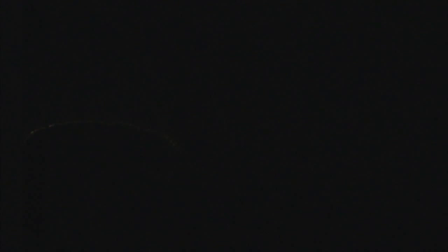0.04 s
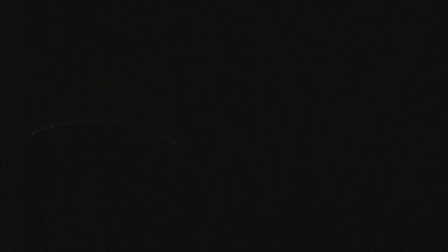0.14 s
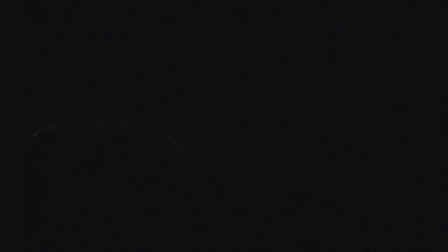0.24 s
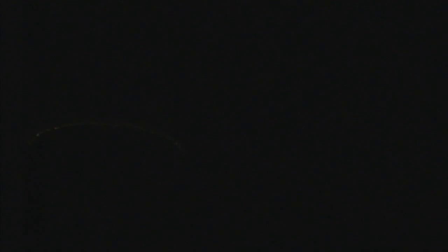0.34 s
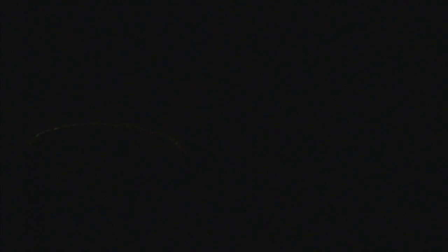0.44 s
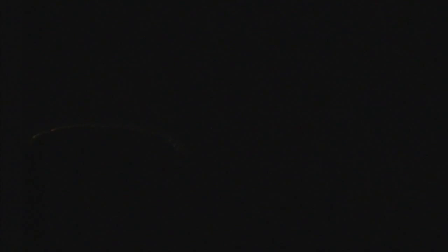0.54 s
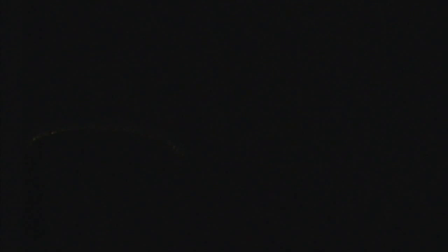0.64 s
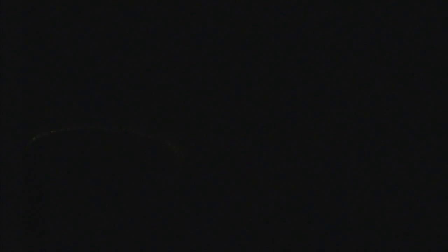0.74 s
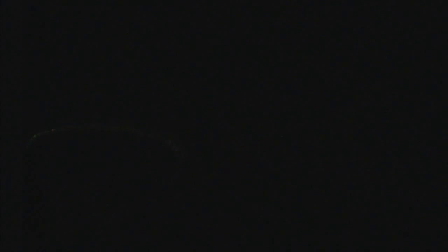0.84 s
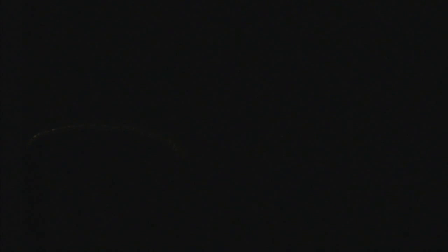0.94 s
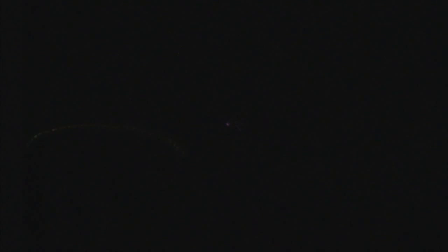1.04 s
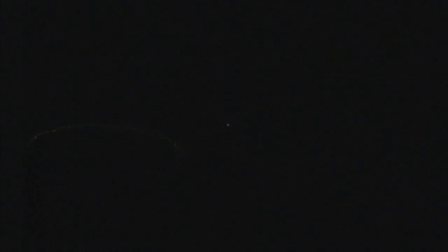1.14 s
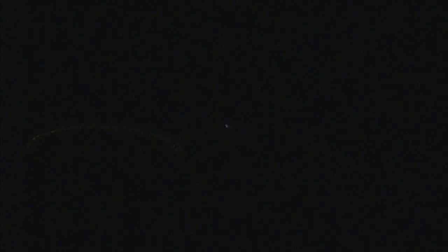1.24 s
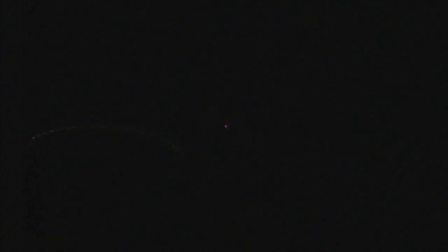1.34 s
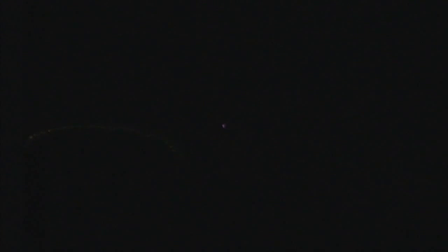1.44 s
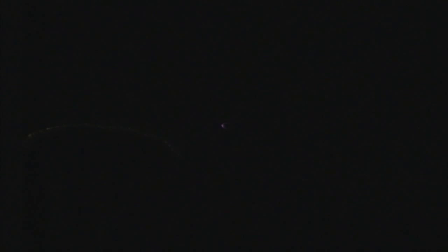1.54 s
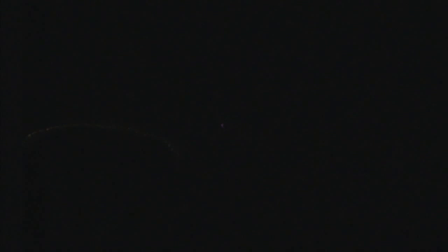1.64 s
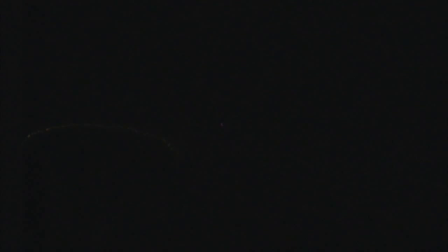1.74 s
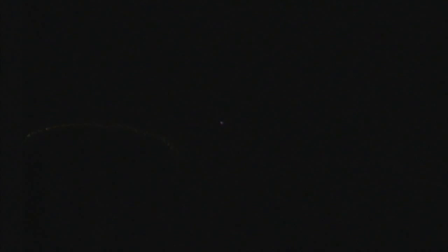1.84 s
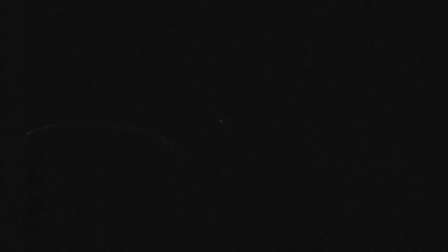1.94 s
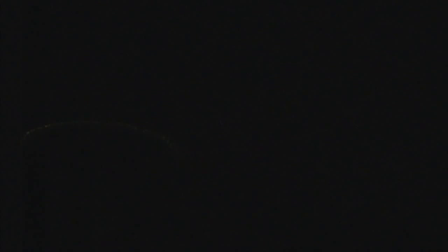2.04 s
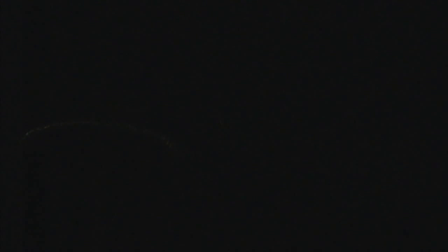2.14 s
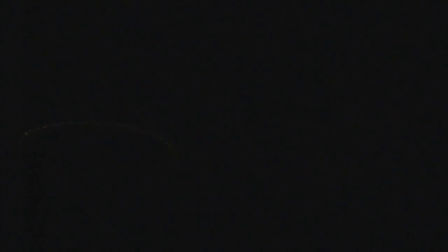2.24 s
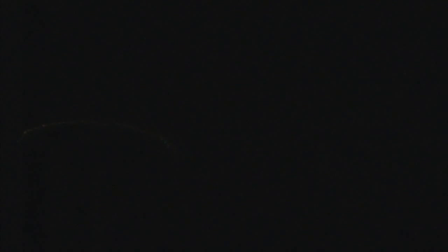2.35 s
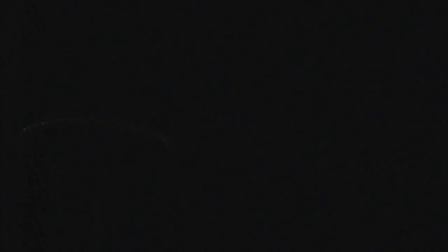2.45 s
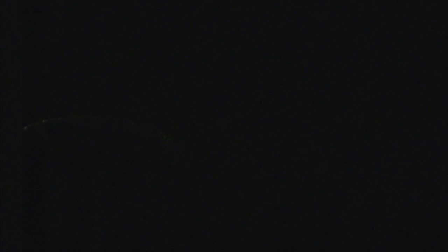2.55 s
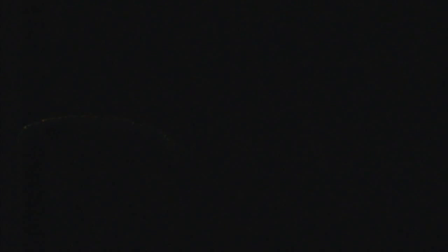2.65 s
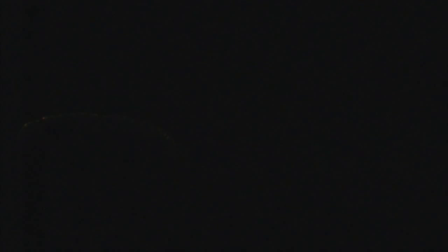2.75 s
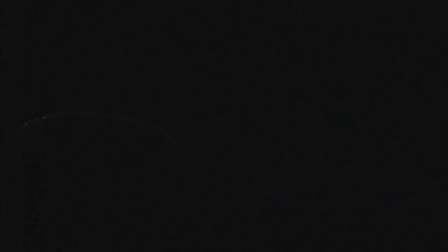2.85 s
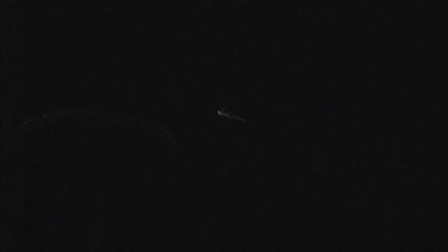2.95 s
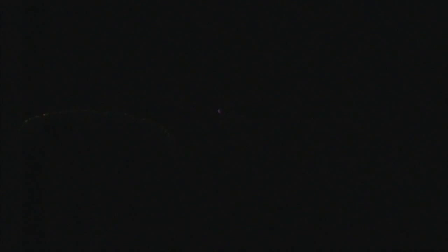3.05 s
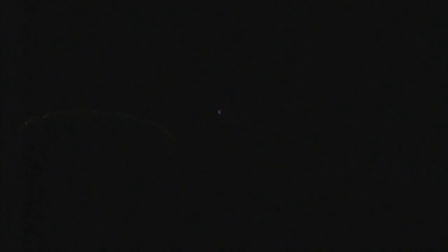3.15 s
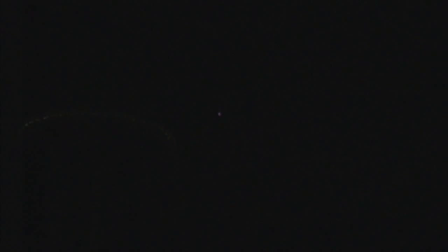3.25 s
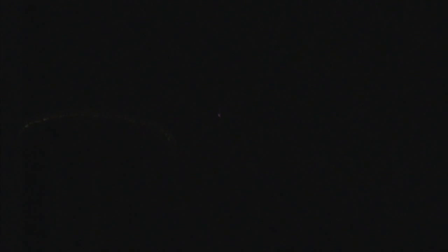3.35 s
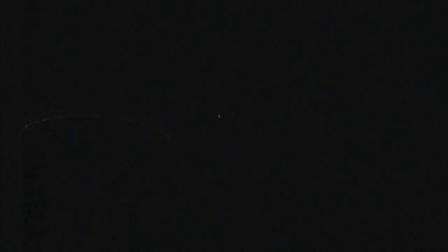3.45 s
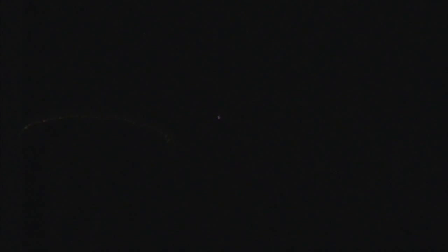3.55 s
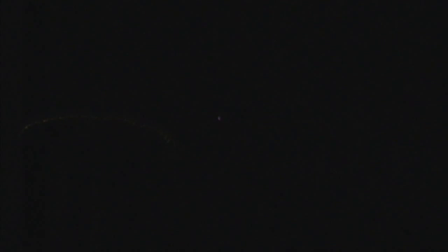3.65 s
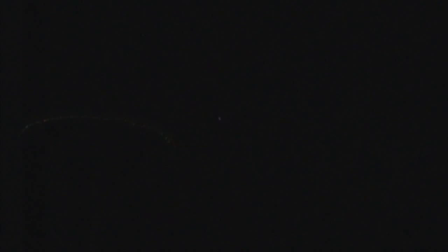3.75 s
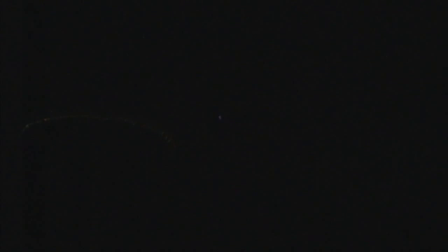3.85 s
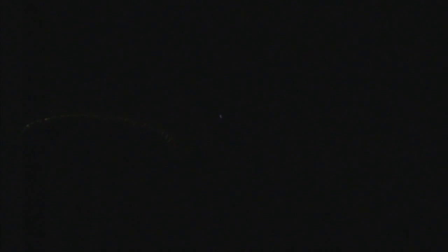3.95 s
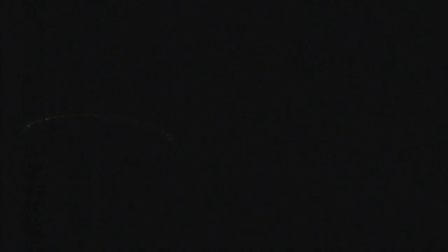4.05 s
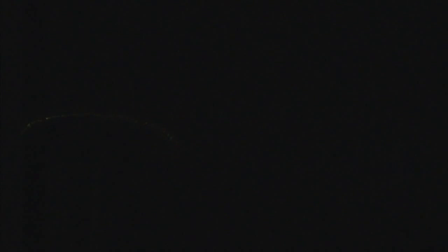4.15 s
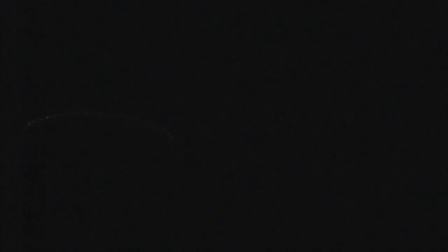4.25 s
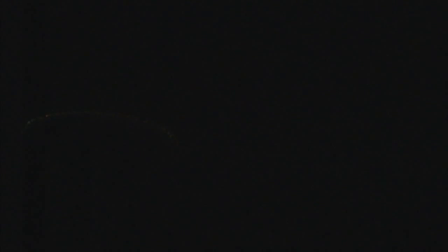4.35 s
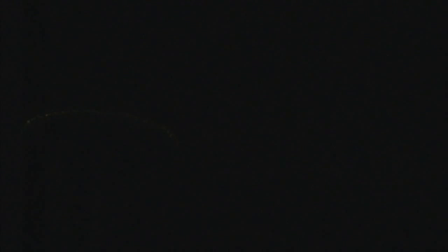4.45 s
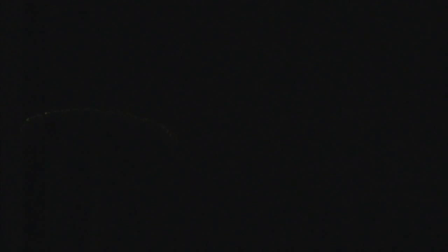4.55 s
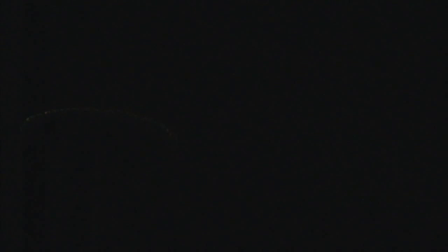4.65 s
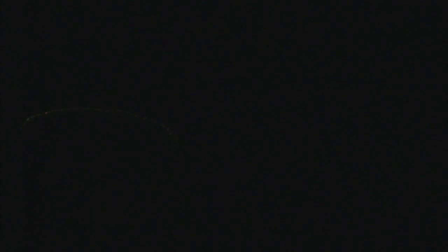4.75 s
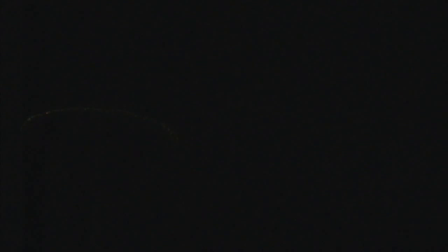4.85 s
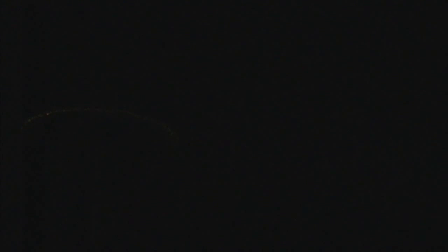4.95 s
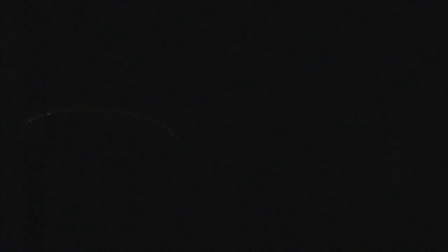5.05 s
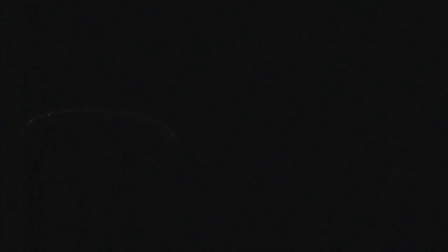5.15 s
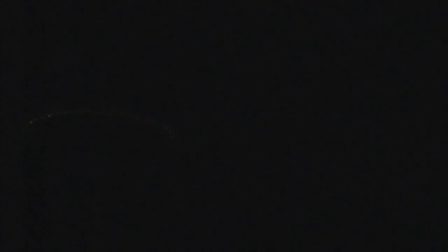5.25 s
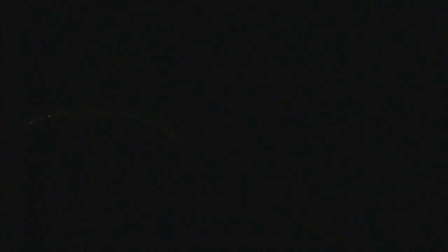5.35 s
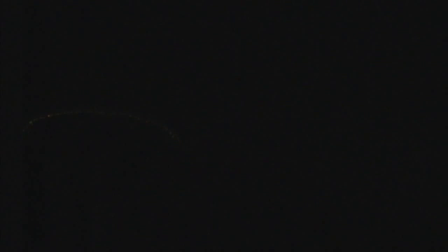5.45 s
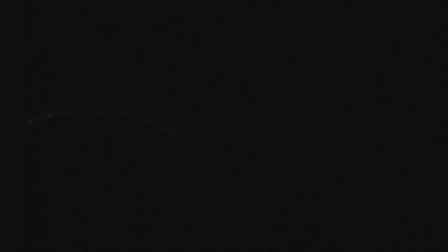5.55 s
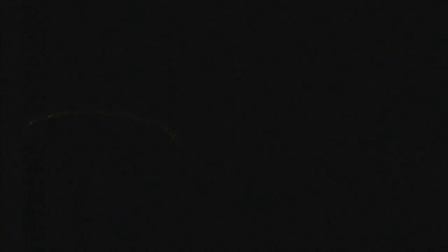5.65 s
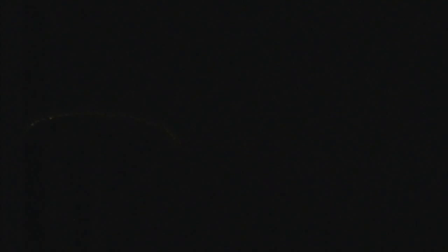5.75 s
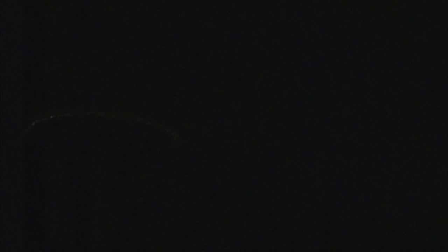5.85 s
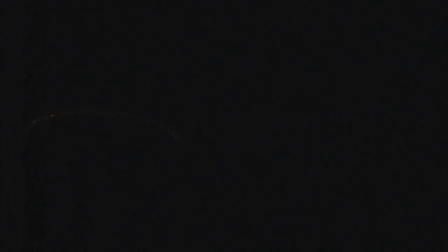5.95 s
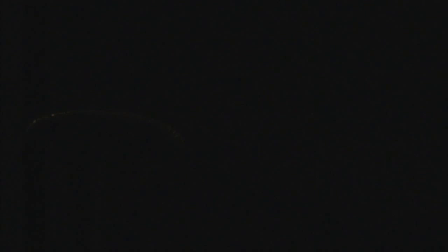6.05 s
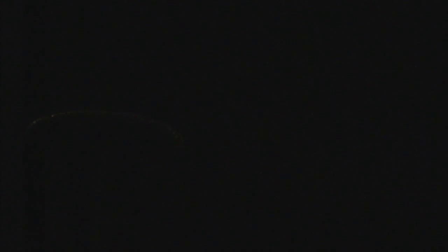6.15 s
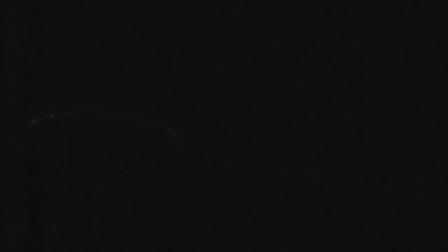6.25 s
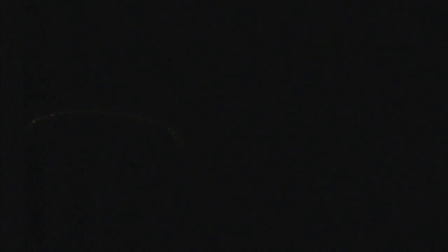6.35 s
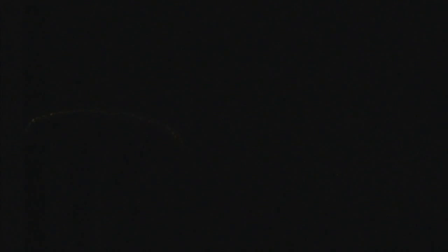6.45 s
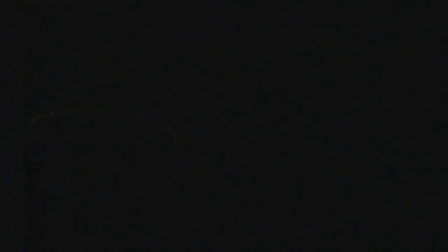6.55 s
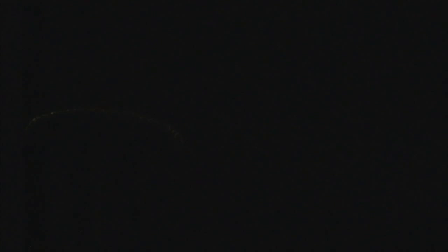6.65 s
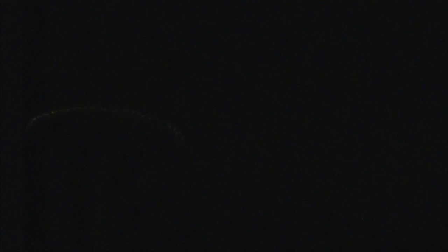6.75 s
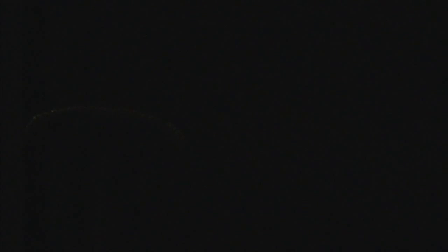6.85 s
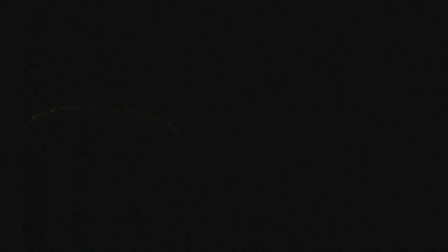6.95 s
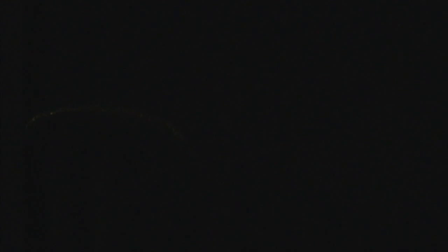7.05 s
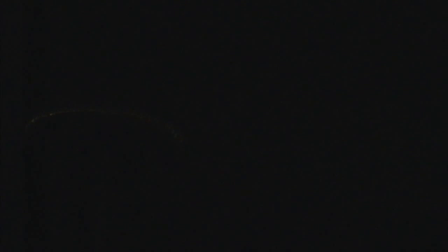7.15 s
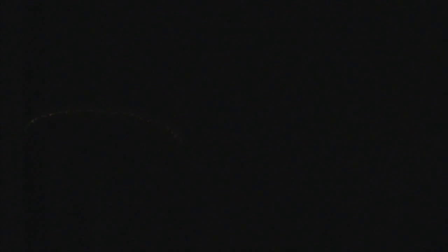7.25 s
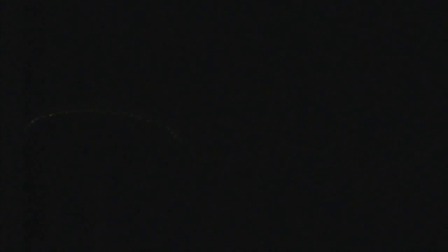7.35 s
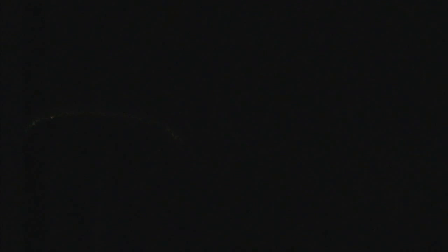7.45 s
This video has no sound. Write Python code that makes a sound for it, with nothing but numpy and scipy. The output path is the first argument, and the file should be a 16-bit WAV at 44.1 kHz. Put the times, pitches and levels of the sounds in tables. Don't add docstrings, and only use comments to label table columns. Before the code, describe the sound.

The tail of a harsh electric buzz stops almost immediately, leaving a rushing, whining fan outdoors at night. A sharp switch snap triggers a fierce, bright spark buzz for a second; a soft rustle follows, then another snap and burst. Afterwards come only fan, low air bumps and three loud lone snaps. The microphone's automatic level ducks the fan in each burst and slowly lifts it back.

```python
import sys
import numpy as np
from scipy import signal
from scipy.fft import rfft, irfft, next_fast_len
from scipy.io import wavfile
from scipy.ndimage import uniform_filter1d

SR = 44100
rng = np.random.default_rng(int(sys.argv[2]) if len(sys.argv) > 2 else 0)


def digitize_waveform(pressure):
    field = np.atleast_2d(pressure).T
    bounded = np.clip(field, -1, 1)
    quanta = np.round(bounded * 32767).astype(np.int16)
    wavfile.write(sys.argv[1], SR, quanta)


def attenuation_scalar(level_db):
    decades = np.asarray(level_db, float) / 20
    return 10 ** decades


N = 331014
T = np.arange(N) / SR

# on [t/s], off [t/s], arc path [0 or 1]
COIL_RUNS = [
    (-.2, .046, 1),
    (1.038, 2.071, 0),
    (3.013, 4.038, 1),
]
# time [t/s], strength [level/dB]
ARC_STRENGTH = [
    [(0, -6.5), (.034, -2.5), (.047, -8)],
    [(1.04, -2), (1.07, -3.5), (1.2, -4.5), (1.4, -5), (1.6, -4), (1.8, -6), (2.07, -4.5)],
    [(3.015, -2), (3.04, -2.5), (3.2, -6.5), (3.4, -5), (3.55, -4), (3.7, -6), (3.9, -5), (4.05, -5.5)],
]
# time [t/s], peak as heard [level/dB]
FIRST_SPARKS = [
    (1.0186, 0),
    (1.0252, -5),
    (1.0312, -6),
    (2.9910, 2),
    (3.0003, -4),
    (3.0061, -8),
]
# pitch [f/Hz], width [f/Hz], on arc path 0 [level/dB], on arc path 1 [level/dB]
HOUSING_RINGS = [(1510, 500, -19.5, -18), (1822, 72, -10.5, -8), (2030, 140, -27, -19),
                 (2553, 96, -6.5, -5.5), (2760, 480, -11, -9), (3283, 81, -12, -11.5),
                 (3830, 164, -13.5, -11), (4260, 150, -14.5, -12.5), (4690, 350, -20, -14),
                 (5090, 67, -14, -15), (5650, 130, -17.5, -11.5), (6526, 600, -10, -7),
                 (7096, 128, -2.5, 0), (7407, 166, -3, -0.5), (7840, 95, -5.5, -3), (8320, 260, -4, -2.5),
                 (8830, 420, -7, -6), (9390, 180, -9, -9), (13695, 90, 1, -12), (10180, 260, -12.5, -10),
                 (10810, 160, -10, -7), (11200, 250, -12.5, -12.5), (12070, 260, -20, -9),
                 (12400, 200, -15, -9), (12170, 510, -14, -13), (13460, 430, -8, -7), (14100, 160, -4, 1.5),
                 (15200, 260, -7, -4), (15200, 250, -7.5, -4), (15440, 640, -7.5, -6.5)]
# pitch [f/Hz], gain [level/dB]
TREE_COLOUR = [(3000, -28), (6000, -12), (8000, -7), (9500, -10), (11500, -13), (12800, -6), (13700, 0),
               (14600, -5), (16000, -9)]
# time [t/s], peak [level/dB], treble [level/dB], treble top [f/Hz], case ring [level/dB]
SWITCH_SNAPS = [
    (0.0674, -30, 1, 12000, -7),
    (1.0095, -7.5, 0, 16000, 4),
    (2.079, -27, -8, 12000, 2),
    (2.9806, -8, -2, 16400, -5),
    (4.0439, -24.5, -4, 12000, -5),
    (4.8703, -6.5, -1, 18000, -1.5),
    (5.722, -7, -0.5, 12500, -6),
    (6.0697, -29.5, -24, 12000, 11.5),
    (6.6714, -9, -0.5, 17000, 1.5),
]
# pitch [f/Hz], strength [level/dB], time to fall 60 dB [t/s]
CASE_RINGS = [(520, -18, .03), (1180, -7, .025), (1600, -10, .025), (2000, -8, .02), (2290, 0, .03),
              (2650, -7, .02), (3120, -4, .018), (4060, 0, .022), (5270, -7, .018), (6020, -10, .015),
              (6450, -10, .018)]
# time [t/s], peak [level/dB], pitch [f/Hz]
AIR_KNOCKS = [(.118, -50, 220), (.4224, -43, 226), (0.7239, -36.5, 223.9), (.9095, -23, 266),
              (1.1574, -48, 218), (1.1755, -45, 260), (1.1994, -46, 204), (1.2127, -48, 247),
              (1.31, -50, 238), (1.676, -46, 231), (1.7105, -42, 237), (1.7427, -49, 219),
              (4.495, -27.5, 222), (4.949, -30, 175), (5.121, -37, 170), (5.133, -37, 170),
              (5.5658, -24.5, 206), (5.5983, -28, 222), (5.6573, -29, 190), (5.6803, -37, 150),
              (6.633, -42, 206), (7.1705, -30, 170), (7.3622, -32, 179)]
# time [t/s], peak [level/dB], pitch [f/Hz]
AIR_FLUTTERS = [
    (4.4396, -33.5, 175),
    (4.483, -30.5, 180),
    (4.64, -41, 163),
    (5.07, -39, 160),
    (5.581, -38, 159),
    (5.641, -35, 190),
    (6.76, -45, 189),
]
# pitch [f/Hz], strength per Hz [level/dB]
FAN_AIR = [(40, -66), (100, -15.5), (160, -7), (300, -10), (500, -58), (9500, -25), (12000, -24.5),
           (13000, -29.5), (16000, -35)]
# pitch [f/Hz], width [f/Hz], strength [level/dB]
COWL_RINGS = [(609, 395, -7), (1223, 400, -1.5), (1733, 430, -3), (2790, 1060, -6.5), (3243, 760, -3.5),
              (4283, 510, -3.5), (4820, 300, -12), (5380, 650, -8), (6880, 1450, -9.5), (8260, 1340, -15)]
# multiple of the blade rate, strength [level/dB]
BLADE_TONES = [(1, -60), (2, -51), (3, -52), (4, -62), (5, -58), (7, -68)]
# first spark [t/s], let-go [t/s], settled depth [level/dB], creep back [t/s]
BURST_DUCKS = [
    (-.3, 0.135, -20, .8),
    (1.024, 2.142, -18, .67),
    (2.999, 4.069, -17, .6),
]
# time [t/s], change [level/dB]
SNAP_DIPS = [
    (4.87, 0.5),
    (5.722, -4),
    (6.671, -1.5),
]


def coil(wall_db=-26, wall_cut_hz=4000, wall_delay_s=.061, far_db=-23.5, far_t60=.55):
    swarm, out = sparks(), 0
    hz = np.fft.rfftfreq(8192, 1 / SR)
    small = 1 / np.sqrt(1 + (1010 / (hz + 1)) ** 16) + attenuation_scalar(-50)
    frame = resonances([(668, 30, -31)], 8192)
    for on, off, path in COIL_RUNS:
        rings = resonances([(f, width, dbs[path]) for f, width, *dbs in HOUSING_RINGS], 8192)
        housing = small * np.hypot(rings, attenuation_scalar(-23)) + frame
        run = swarm * (T > on - .05) * (T < off)
        out = out + through(run, unit(irfft(causal(housing))))
    before = slice(int(3.5 * SR), int(4.0004 * SR))
    wall = np.r_[out[before], out][-N - int(wall_delay_s * SR):][:N]
    wall = signal.sosfilt(signal.butter(2, wall_cut_hz, "highpass", fs=SR, output="sos"), wall)
    trees = irfft(rfft(rng.standard_normal(SR)) * colour(TREE_COLOUR, SR))
    trees = trees * fade(np.arange(SR) / SR, far_t60)
    far = signal.fftconvolve(np.r_[swarm[before], swarm], unit(trees))
    far = far[len(swarm[before]):][:N]
    return out + attenuation_scalar(wall_db) * wall + attenuation_scalar(far_db) * far


def sparks(per_s=30000, half_db=.8, flicker_db=.8, weak_half_db=0.4, strike_db=7):
    mains_hz, mains_turn = 59.994, .345
    turns = 2 * (T * mains_hz - mains_turn) + 40
    phase, half = turns % 1, turns.astype(int)
    swell_db = np.interp(phase, [0, .08, .3, .55, .8, 1], [-14, -1.5, 0, -1, -4.5, -14])
    swell_db += half_db * rng.standard_normal(half[-1] + 1)[half]
    swell_db += (half % 2 - .5) * np.where(T < COIL_RUNS[0][1], 4, weak_half_db)
    swell_db += flicker_db * walk(600)
    swarm = (rng.random(N) < per_s / SR) * rng.standard_normal(N) * attenuation_scalar(swell_db)
    warm_s, cold_db = .03, -4
    burning = sum(((T > on) & (T < off)) * attenuation_scalar(cold_db * (1 - ramp(on, warm_s))) for on, off, _ in COIL_RUNS)
    swarm = set_rms(swarm, 0) * burning * attenuation_scalar(curve(np.vstack(ARC_STRENGTH)))
    duck_db = gain_db()
    for s, db in FIRST_SPARKS:
        after = rng.standard_normal(512) * fade(np.arange(512) / SR, .013) * .1
        now = slice(int(s * SR), int(s * SR) + 512)
        swarm[now] += attenuation_scalar(db + strike_db - duck_db[now]) * (after - (np.arange(512) == 0))
    return swarm


def thuds(thud_db=-2, low_hz=300, high_hz=9000, span_s=.00016):
    push, shock = np.zeros(N), np.linspace(-1, 1, int(span_s * SR))
    for s, db in FIRST_SPARKS:
        push[int(s * SR):int(s * SR) + len(shock)] = attenuation_scalar(db + thud_db) * shock
    return bandpass(push, low_hz, high_hz)


def switch(crack_t60=0.018, treble_t60=0.012, echo_db=-16, thump_db=-17, thump_hz=450, thump_t60=0.023):
    out, t = np.zeros(N + 4096), np.arange(4096) / SR
    for s, db, treble_db, top_hz, ring_db in SWITCH_SNAPS:
        noise = rng.standard_normal((2, 4096)) * np.minimum(t / 0.00021, 1)
        ring = 0
        for hz, strength_db, t60 in CASE_RINGS:
            ring = ring + attenuation_scalar(strength_db) * fade(t, t60) * np.sin(2 * np.pi * (hz * t + rng.random()))
        body = peak_one(bandpass(noise[0] * fade(t, crack_t60), 1700, 5600))
        body += attenuation_scalar(ring_db) * np.minimum(t / 0.0023, 1) * peak_one(ring)
        knock = peak_one(bandpass(noise[0] * fade(t, thump_t60), thump_hz, 1900))
        body += attenuation_scalar(thump_db - ring_db) * knock
        crack = peak_one(bandpass(noise[1] * fade(t, treble_t60), 8800, top_hz))
        snap = body + attenuation_scalar(treble_db) * crack
        snap += attenuation_scalar(echo_db) * np.roll(crack, int(.007 * SR))
        out[int(s * SR):int(s * SR) + 4096] += attenuation_scalar(db) * snap
    return out[:N]


def bumps(knock_swings=1.03, flutter_swings=2.86):
    out = np.zeros(N)
    for table, swings in [(AIR_KNOCKS, knock_swings), (AIR_FLUTTERS, flutter_swings)]:
        for s, db, hz in table:
            now = slice(int(s * SR) - 2048, int(s * SR) + 2048)
            t = T[now] - s
            out[now] -= attenuation_scalar(db) * np.cos(2 * np.pi * hz * t) * np.exp(-(2 * hz * t / swings) ** 2)
    return out


def rustle(start_s=2.09, rise_s=0.14, hold_s=.6, fall_s=.1, rustle_db=-55):
    shape = ramp(start_s, rise_s) * (1 - ramp(start_s + rise_s + hold_s, fall_s))
    hiss = bandpass(rng.standard_normal(N), 1700, 2400) * attenuation_scalar(2 * walk(39.7))
    return set_rms(hiss, rustle_db) * shape


def fan(air_db=-37, flicker_db=0.5, flutter_db=4.0, blade_hz=586.0):
    size = next_fast_len(N)
    cowl = resonances(COWL_RINGS, size) * np.minimum(np.fft.rfftfreq(size, 1 / SR) / 300, 1) ** 4
    spectrum = rfft(rng.standard_normal(size)) * np.hypot(colour(FAN_AIR, size), cowl)
    air = irfft(spectrum, size)[:N] * attenuation_scalar(flicker_db * walk(9.9))
    turn = 2 * np.pi * np.cumsum(blade_hz * (1 + .004 * walk(15))) / SR
    blade = sum(attenuation_scalar(db + flutter_db * walk(30)) * np.sin(k * turn) for k, db in BLADE_TONES)
    return set_rms(air, air_db) + np.sqrt(2) * blade


def breeze(rumble_db=-56, low_hz=70):
    return set_rms(bandpass(rng.standard_normal(N), low_hz, 260) * attenuation_scalar(4 * walk(12)), rumble_db)


def gain_db(rest_db=0.91, grab_s=.026, overshoot_db=-8, settle_s=0.17, creep_bend=1.21, dip_s=0.2):
    out = rest_db
    for on, off, depth_db, creep_s in BURST_DUCKS:
        held_db = depth_db * (1 - ramp(off, creep_s) ** creep_bend)
        extra_db = overshoot_db * (1 - ramp(on + grab_s, settle_s))
        out = out + ramp(on, grab_s) * (held_db + extra_db)
    return out + sum(db * ramp(s, 0.029) * (1 - ramp(s, dip_s)) for s, db in SNAP_DIPS)


def curve(table):
    return np.interp(T, *np.transpose(table))


def ramp(start, length):
    return np.clip((T - start) / length, 0, 1)


def fade(t, t60):
    return (t >= 0) * attenuation_scalar(-60 * np.maximum(t, 0) / t60)


def walk(rate):
    k = int(SR / rate)
    steps = np.repeat(rng.standard_normal(N // k + 1), k)
    return 1.207 * uniform_filter1d(uniform_filter1d(steps, k), k)[:N]


def set_rms(x, db):
    return x * attenuation_scalar(db) / np.sqrt(np.mean(x ** 2))


def peak_one(x):
    return x / np.abs(x).max()


def unit(response):
    return response / np.sqrt(np.sum(response ** 2))


def bandpass(x, low_hz, high_hz):
    return signal.sosfilt(signal.butter(2, [low_hz, high_hz], "bandpass", fs=SR, output="sos"), x)


def colour(spectrum, size):
    hz, db = np.transpose(spectrum)
    return attenuation_scalar(np.interp(np.log(np.fft.rfftfreq(size, 1 / SR) + 1), np.log(hz), db))


def resonances(peaks, size):
    f = np.fft.rfftfreq(size, 1 / SR)
    return np.sqrt(sum(attenuation_scalar(2 * db) / (1 + (2 * (f - hz) / w) ** 4) for hz, w, db in peaks))


def causal(gain):
    cep = irfft(np.log(gain))
    half = len(cep) // 2
    cep[1:half] *= 2
    cep[half + 1:] = 0
    return np.exp(rfft(cep))


def through(x, response):
    return signal.fftconvolve(x, response)[:N]


def scene():
    as_heard = switch() + bumps() + thuds() + rustle()
    return (coil() + fan() + breeze() + as_heard / attenuation_scalar(gain_db()))[None]


def band_limit(x):
    return signal.sosfilt(signal.butter(12, 16650, fs=SR, output="sos"), x)


def record(dry):
    bass_cut = signal.butter(2, 70, "highpass", fs=SR, output="sos")
    heard = signal.sosfilt(bass_cut, dry * attenuation_scalar(gain_db()))
    top_cut = causal(colour([(15700, 0), (15830, -42), (16600, -45)], N + 2048))
    heard = irfft(rfft(heard, N + 2048) * top_cut)[:, :N]
    return band_limit(np.clip(heard, -1, 1))


dry = scene()
out = record(dry)
digitize_waveform(out)
```